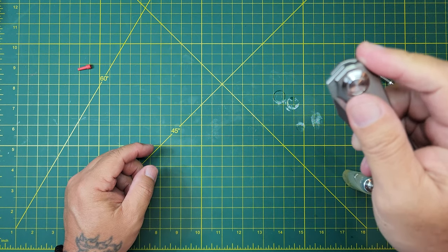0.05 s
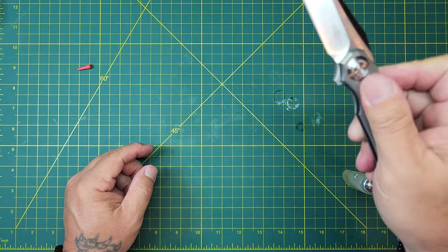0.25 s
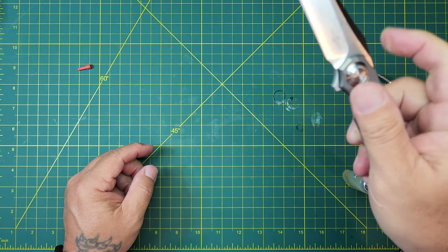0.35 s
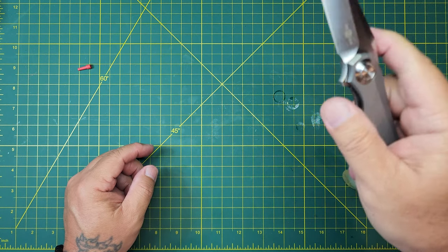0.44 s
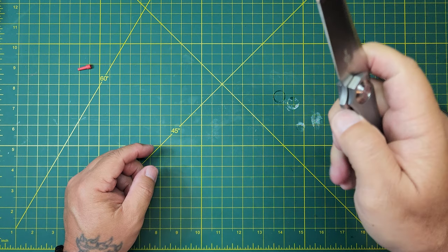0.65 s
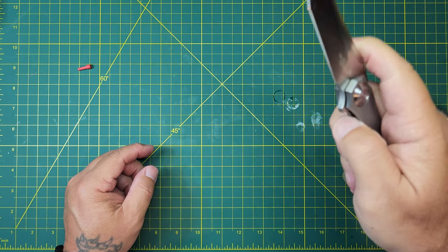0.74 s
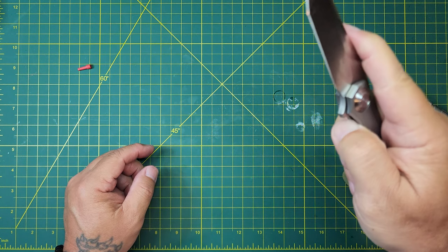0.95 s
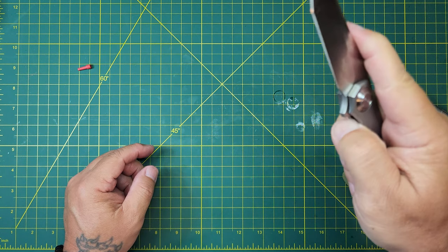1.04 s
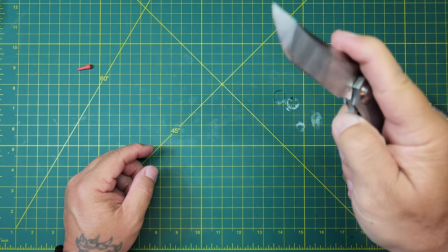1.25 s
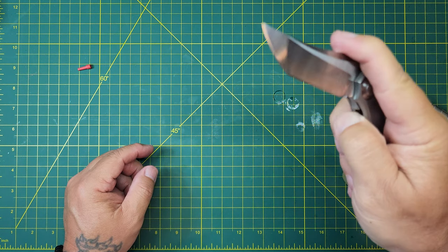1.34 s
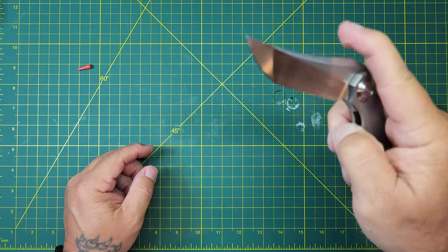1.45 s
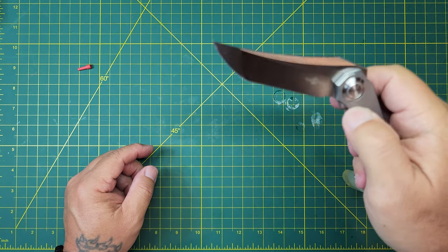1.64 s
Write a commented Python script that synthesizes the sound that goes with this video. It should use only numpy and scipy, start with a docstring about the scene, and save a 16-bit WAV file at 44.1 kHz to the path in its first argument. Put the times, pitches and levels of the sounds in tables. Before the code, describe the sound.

A folding knife flicks open with a sharp metal snap, then its lock clicks free.

```python
"""A folding knife flicks open: the pivot swishes, the blade slams on its stop and the lock snaps in.
Later the thumb pushes the lock bar aside with a duller click, and the blade slides shut, rubbing faintly.
Each click is a burst of noise plus the ringing tones of struck steel.
A small room echoes after each click, over a low steady hum. The stereo microphone is close."""
import sys
import numpy as np
from scipy import signal
from scipy.fft import rfft, irfft
from scipy.io import wavfile
from scipy.ndimage import uniform_filter1d

SR = 44100
rng = np.random.default_rng(int(sys.argv[2]) if len(sys.argv) > 2 else 0)


def unload_audio(sound):
    """Save the sound as a 16-bit wav file, at the path given as the first command line argument."""
    columns = np.transpose(np.atleast_2d(sound))
    # keep every value between -1 and 1, then stretch to whole-number steps
    steps = np.round(np.clip(columns, -1, 1) * 32767)
    wavfile.write(sys.argv[1], SR, steps.astype(np.int16))


N = 74970
TIME = np.arange(N) / SR
FREQS = np.fft.rfftfreq(N, 1 / SR)


def undb(db):
    """Turns decibels into a number to multiply by."""
    return 10 ** (np.asarray(db) / 20)


def fade(fade_s):
    """Dies away by 60 dB in fade_s seconds, the fade time."""
    return np.exp(-np.log(1000) * TIME / fade_s)


def later(x, seconds):
    """Delays a sound."""
    gap = int(np.clip(round(seconds * SR), 0, N - 1))
    return np.concatenate([np.zeros(gap), x[:N - gap]])


def wander(rate_hz):
    """A smooth random wobble, about 1 in size."""
    size = max(int(SR / rate_hz), 1)
    steps = np.repeat(rng.standard_normal(N // size + 1), size)[:N]
    smooth = uniform_filter1d(uniform_filter1d(steps, size), size)
    return smooth / smooth.std()


def tint(x, colour):
    """Gives a sound a colour, a balance of low and high; white noise keeps its power."""
    hz, db = np.array(colour, float).T
    gain = undb(np.interp(np.log(np.maximum(FREQS, 1)), np.log(hz), db))
    gain /= np.sqrt(np.mean(gain ** 2))
    # fold the filter in time, so nothing sounds before its cause
    cepstrum = irfft(np.log(gain), N)
    cepstrum[1:N // 2] *= 2
    cepstrum[N // 2 + 1:] = 0
    return irfft(rfft(x) * np.exp(rfft(cepstrum)), N)


def noise(colour):
    """Steady coloured noise, about 1 in size."""
    return tint(rng.standard_normal(N), colour)


def burst(colour, fade_s):
    """Coloured noise that starts at once and dies away."""
    return tint(rng.standard_normal(N) * fade(fade_s), colour)


def ring(tones):
    """The fading tones of a struck object; neighbours swing opposite ways."""
    return sum((-1) ** k * undb(db) * np.sin(2 * np.pi * hz * TIME) * fade(fade_s)
               for k, (hz, db, fade_s) in enumerate(tones))


# Each row: pitch in Hz, level in dB, amount of waver as a fraction.
HUM_TONES = [(55.92, -55.5, 0.66), (107.98, -64.5, 0.37), (235.17, -68, 0.22), (242.1, -71, 0.23)]
def hum():
    """Low tones that waver."""
    out = 0
    for hz, db, waver in HUM_TONES:
        wobble = 1 + waver * (wander(13) + 1j * wander(11)) / np.sqrt(2)
        tone = np.exp(2j * np.pi * (hz * TIME + rng.random()))
        out += undb(db) * np.sqrt(2) * np.real(wobble * tone)
    return out


# Each row: frequency in Hz, relative level in dB.
AIR_COLOUR = [(20, -0.5), (32, 0.5), (45, -6.5), (75, -3.5), (130, -4.5), (185, -20.5), (330, -20.5),
              (600, -31.5), (1200, -32), (2500, -40), (6000, -49), (10000, -56.5), (15500, -56)]
def background():
    """Hum and room air, mostly alike left and right."""
    middle = hum() + undb(-58) * noise(AIR_COLOUR)
    side = undb(-23) * hum() + undb(-62.5) * noise(AIR_COLOUR)
    return np.array([middle + side, middle - side])


# Each row: start, rise time and fall time in seconds, level in dB.
BLADE_TURNS = [(0.141, 0.092, 0.0023, -40), (.50, 0.0855, 0.2, -74), (1.59, 0.0582, 0.0667, -71)]
# Each row: frequency in Hz, relative level in dB.
RUB_COLOUR = [(300, -12.5), (1300, -18), (2150, -4.5), (2700, -13), (3600, -1), (5000, 4), (6300, -2.5),
              (8300, 1.5), (12000, -8.5), (15500, -2)]
def pivot_rub(grain_db=3):
    """Steel rubs at the pivot: a grainy swish that swells as the blade turns."""
    swell = sum(undb(db) * np.interp(TIME, [start, start + rise, start + rise + fall], [0, 1, 0]) ** 1.2
                for start, rise, fall, db in BLADE_TURNS)
    return swell * noise(RUB_COLOUR) * undb(grain_db * wander(500))


# Each row: start in seconds, level in dB.
BALL_SLIPS = [(.151, -53), (1.119, -44.5)]
def ball_pings(hz=2067, fade_s=0.016):
    """The small ball that holds the blade slips over it and pings."""
    return sum(later(ring([(hz, db, fade_s)]), start) for start, db in BALL_SLIPS)


# Each row: start in seconds, level in dB.
FINGER_BUMPS = [(.165, -59), (0.301, -60.5)]
# Each row: frequency in Hz, relative level in dB.
BUMP_COLOUR = [(80, 0.5), (200, -10), (380, 0), (900, -9), (2000, -17), (8000, -37)]
def finger_bumps(fade_s=.09):
    """Fingers bump the handle softly as the grip shifts."""
    return sum(undb(db) * later(burst(BUMP_COLOUR, fade_s), start) for start, db in FINGER_BUMPS)


# Each row: start and length in seconds, pitch in Hz, level in dB.
STEEL_SQUEAKS = [(0.174, 0.022, 5100, -51), (0.19, 0.023, 3550, -46), (0.572, .08, 2880, -73.5),
                 (0.583, 0.086, 3460, -75), (0.593, 0.296, 4800, -76.5), (1.61, 0.097, 9420, -80.5)]
def squeaks(width_hz=760):
    """Rubbing makes the steel ring briefly, one rough tone for each squeak."""
    out = 0
    for start, length, hz, db in STEEL_SQUEAKS:
        roughness = wander(width_hz) + 1j * wander(width_hz)
        tone = np.real(roughness * np.exp(2j * np.pi * hz * TIME))
        swell = np.sin(np.pi * np.clip((TIME - start) / length, 0, 1))
        out += undb(db) * swell * tone
    return out


# The blade hits its stop and the lock seats. Each row: start in seconds, level in dB.
SNAP_HITS = [(.2060, -6), (.2089, -12.5), (.2101, -6.5), (0.2099, -2)]
# The open knife rings. Each row: pitch in Hz, relative level in dB, fade time in seconds.
KNIFE_TONES = [(2142.7, -23.5, .06), (2271.1, -15.5, 0.081), (2350.4, -28, .12), (3433, -25, 0.075),
               (3843, -17, .035), (4568, -12.5, .035), (4833, -14.5, 0.059), (4961, -24.5, 0.025),
               (6123, -16, .03), (6510, -18, .03), (7630, -24.5, 0.045), (8200, -19.5, 0.032),
               (8560, -20, .035), (11944, -21, .02)]
# Steel cracks on steel. Each row: frequency in Hz, relative level in dB.
CRACK_COLOUR = [(100, -10), (200, -24), (400, -16.5), (800, -15.5), (1300, -20), (2200, -1), (2900, -11.5),
                (3700, 0.5), (8000, 0.5), (10500, -8), (15500, -6.5)]
# Two close blade tones flutter together. Each row: pitch in Hz, level in dB, fade time in seconds.
SINGING_TONES = [(4746, -49, 0.73), (4815, -53, .7)]
def blade_snap():
    """Quick steel hits ring the knife; the hardest jolts the handle and leaves the blade singing."""
    ringing = ring(KNIFE_TONES)
    hits = sum(undb(db) * later(ringing + burst(CRACK_COLOUR, fade_s=0.015), start)
               for start, db in SNAP_HITS)
    hardest_start = max(SNAP_HITS, key=lambda row: row[1])[0]
    handle_thump = (100, -37, 0.093)  # Hz, dB, fade time in seconds
    return undb(-3.5) * hits + later(ring(SINGING_TONES + [handle_thump]), hardest_start)


# The lock drags on the blade. Each row: time in seconds, level in dB.
LOCK_DRAG = [(1.111, -66), (1.121, -50), (1.127, -55), (1.135, -62)]
# The lock bar is pushed off the blade. Each row: start in seconds, level in dB.
LOCK_SLIPS = [(1.1096, -31), (1.1194, -24.5), (1.13, -35.5), (1.1329, 2)]
# Each row: pitch in Hz, relative level in dB, fade time in seconds.
LOCK_TONES = [(2154.3, -60, 0.0351), (2416, -41.5, 0.0413), (2779, -32, 0.0145), (3700, -39, 0.0166),
              (4319, -32.5, 0.0108), (4683, -29, 0.0164), (5825, -43.5, 0.05), (7993, -37.5, 0.0143)]
# Each row: frequency in Hz, relative level in dB.
TICK_COLOUR = [(300, -34), (1200, -25.5), (2300, 2), (4700, -0.5), (6300, -2.5), (8300, -14), (10000, -8),
               (12000, -18), (15500, -15.5)]
def lock_release():
    """The lock bar scrapes and creeps in small ticks, then jumps free, muffled by the thumb."""
    times, drag_db = np.array(LOCK_DRAG).T
    scrape = noise(TICK_COLOUR) * np.interp(TIME, times, undb(drag_db), left=0, right=0)
    ringing = ring(LOCK_TONES)
    ticks = sum(undb(db) * later(ringing + undb(-31) * burst(TICK_COLOUR, fade_s=0.00852), start)
                for start, db in LOCK_SLIPS)
    return scrape + ticks


# Each row: frequency in Hz, echo level in dB, fade time in seconds.
ROOM_ECHO = [(150, -10, .45), (600, -4.5, 0.34), (1300, -5, 0.38), (2300, -6.5, .42), (4500, -8.5, 0.5),
             (8000, -8.5, .39), (10600, -8, 0.35), (15000, -11, 0.34)]
def room_echo(x, delay_s=.005, build_s=0.0013):
    """Sound bounces off the walls and blurs; each half octave fades at its own rate."""
    hz, db, fade_s = np.array(ROOM_ECHO, float).T
    band = np.round(2 * np.log2(np.clip(FREQS, hz[0], hz[-1]))) / 2
    white = rfft(rng.standard_normal(N))
    build = 1 - np.exp(-TIME / build_s)
    tail = 0
    for octave in np.unique(band):
        shape = build * fade(np.interp(octave, np.log2(hz), fade_s))
        gain = undb(np.interp(octave, np.log2(hz), db)) / np.linalg.norm(shape)
        tail += gain * shape * irfft(white * (band == octave), N)
    return signal.fftconvolve(x, later(tail, delay_s))[:N]


def microphone(x, lag_radians, left_louder_db=0.76):
    """Sound goes straight to both sides of the microphone, reaching the left later."""
    left = irfft(rfft(x) * np.exp(-1j * lag_radians), N)
    return np.array([left * undb(left_louder_db / 2), x * undb(-left_louder_db / 2)])


# The blade's sound lags on the left. Each row: frequency in Hz, lag in radians.
BLADE_LAG = [(200, .1), (1000, .6), (2200, 1.3), (4500, 1.3), (8000, 1.7), (14000, 1.4)]
def scene(lock_lag_s=.00005):
    """The knife, a little to the right, sends a different crack to the walls on each side."""
    handling = pivot_rub() + squeaks() + ball_pings() + finger_bumps()
    blade_lag = np.interp(FREQS, *np.array(BLADE_LAG).T)
    blade = microphone(blade_snap() + handling, blade_lag)
    lock = microphone(lock_release(), 2 * np.pi * FREQS * lock_lag_s)
    # the lock bar is close, so it gets less echo
    walls = np.array([room_echo(blade_snap() + handling + undb(-6.5) * lock_release()) for _ in range(2)])
    return blade + lock + walls + background()


def record(dry, top_hz=16000):
    """Rounds off the loudest peaks and cuts the highest treble."""
    treble_cut = signal.ellip(10, .2, 70, top_hz, fs=SR, output="sos")
    return signal.sosfilt(treble_cut, np.tanh(dry))


dry = scene()
out = record(dry)
unload_audio(out)
```